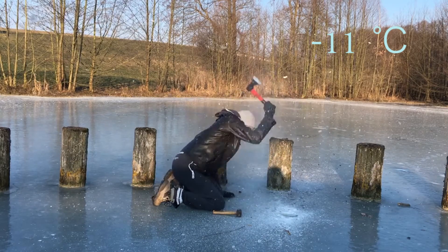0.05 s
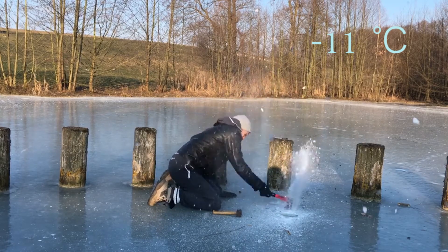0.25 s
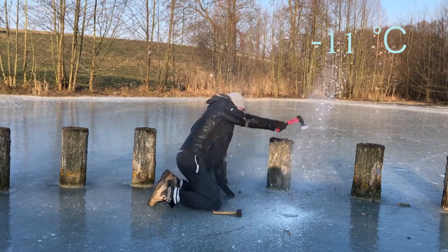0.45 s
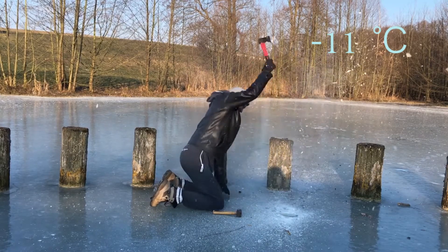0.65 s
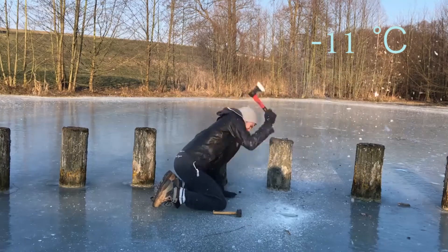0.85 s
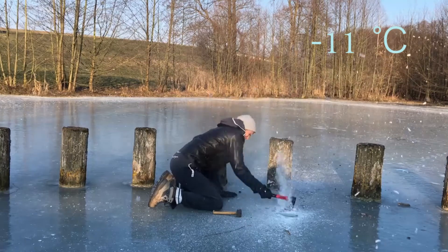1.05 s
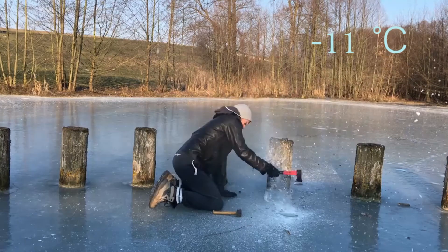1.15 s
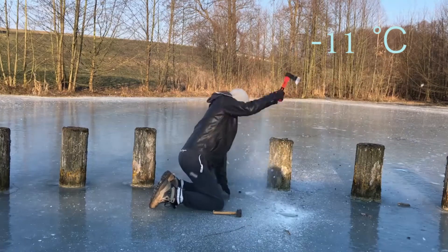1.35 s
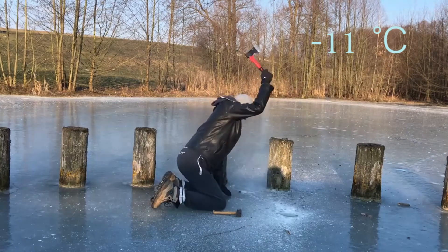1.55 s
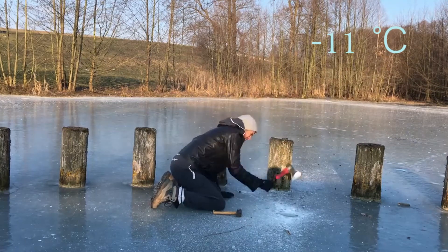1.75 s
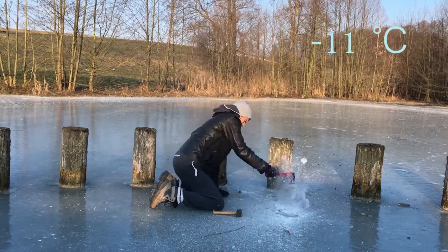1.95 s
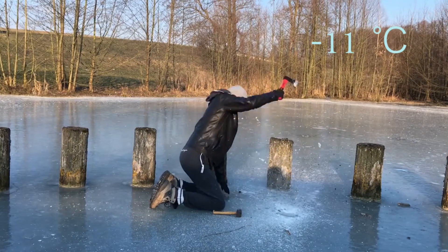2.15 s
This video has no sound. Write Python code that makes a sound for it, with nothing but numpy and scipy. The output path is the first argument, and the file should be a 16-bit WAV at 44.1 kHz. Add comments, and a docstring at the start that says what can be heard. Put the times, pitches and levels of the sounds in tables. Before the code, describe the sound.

On an open frozen pond, three loud hatchet chops crack and thud through the ice, the first strongest, the last with a short woody knock; ice chips click, burst and slide, over faint low air rumble.

```python
"""A hatchet chops three times into thick ice on a pond, a few metres from a phone's microphone. Each blow
arrives first through the ice, then as a crack through the air; the sheet thuds and rings, the banks answer.
Thrown chips tick, burst into spray and bounce as ringing lumps; ice dust skitters over a low open-air rumble.
Blows are noise bands, sine-and-noise rings, a bending wave and, in the third, a short pitched knock; chips
are clicks, grit, thin rings and tones; dust and air are coloured noise with wandering levels."""
import sys
import numpy as np
from scipy import signal
from scipy.fft import rfft, irfft, next_fast_len
from scipy.io import wavfile
from scipy.ndimage import map_coordinates

SR = 44100
rng = np.random.default_rng(int(sys.argv[2]) if len(sys.argv) > 2 else 0)


def unload_audio(sound):
    """Save the sound as a 16-bit wav file, at the path given as the first command line argument."""
    columns = np.transpose(np.atleast_2d(sound))
    # keep every value between -1 and 1, then stretch to whole-number steps
    steps = np.round(np.clip(columns, -1, 1) * 32767)
    wavfile.write(sys.argv[1], SR, steps.astype(np.int16))


def voltage_ratio(decibels):
    """Convert decibels (scalar or array-like) to amplitude ratios, 20 dB per decade."""
    exponent = np.asarray(decibels, float) / 20
    return 10 ** exponent


N = 97020  # samples, 2.2 s


def unit(x):
    """Scale to rms 1."""
    return x / np.sqrt(np.mean(x ** 2) + 1e-20)


def along(points, hz):
    """Read a curve of (Hz, value) points on a log frequency axis."""
    f, v = np.transpose(points)
    return np.interp(np.log(hz + 1), np.log(f + 1), v)


def filtered(x, response):
    """Multiply the spectrum of x by a response of frequency."""
    m = next_fast_len(len(x) + 4096)
    hz = np.fft.rfftfreq(m, 1 / SR) + 1e-3
    return irfft(rfft(x, m) * response(hz), m)[:len(x)]


def noise(n, response):
    """Coloured noise of rms 1."""
    return unit(filtered(rng.standard_normal(n), response))


def wobble(n, rate):
    """A smooth random curve through rate knots a second."""
    knots = rng.standard_normal(int(n * rate / SR) + 4)
    return map_coordinates(knots, [np.arange(n) * rate / SR])


def fall(t, t60):
    """Exponential decay from t = 0, by 60 dB in t60 seconds."""
    return voltage_ratio(-60 * np.maximum(t, 0) / t60)


def fade(t, t60, rise_s):
    """Silence before t = 0, then a rise with time constant rise_s under the exponential decay."""
    return (1 - np.exp(-np.maximum(t, 0) / rise_s)) * fall(t, t60)


def add(out, s, x):
    """Mix x into out at s seconds."""
    i = round(s * SR)
    out[i:i + len(x)] += x[:len(out) - i]


# Colour of the open air over the pond. Each row: frequency in Hz, density in relative dB per Hz.
AIR_COLOUR = [(13, -45), (22, -16), (60, 1), (152, -7.5), (213, -5), (239, -21), (411, -14.5), (553, -31),
              (5000, -39.5), (6500, -25), (11000, -120)]
AIR_DB, AIR_SWAY_DB = -52, 1.5


def air():
    """Low outdoor rumble: coloured noise whose level slowly breathes."""
    level = voltage_ratio(AIR_DB + AIR_SWAY_DB * wobble(N, 3.72))
    return level * noise(N, lambda f: voltage_ratio(along(AIR_COLOUR, f)))


# Fine ice dust sliding over the sheet. Each row: time in seconds, level in dB.
SKITTER_LEVEL = [(0.0, -42), (0.1, -53.5), (0.24, -40.5), (0.38, -43), (0.44, -41.5), (0.62, -37.5),
                 (0.94, -40.5), (1.33, -36), (1.56, -35), (1.72, -39.5), (1.91, -41), (2.02, -45),
                 (2.13, -38.5), (2.2, -32.5)]
# Colour of that dust. Each row: frequency in Hz, density in relative dB per Hz.
DUST_COLOUR = [(470, -2.5), (800, -7), (1310, 2), (1430, -5), (4100, -4), (5020, -12), (14400, -5.5),
               (16500, -1.5)]
CRUMBS_PER_S, CRUMB_T60 = 360, 0.021
CRUMB_DB, CRUMB_SPREAD_DB = -4, 6  # the smallest crumb, before the mix is set to rms 1, and the spread upwards
BIGGEST_SHARE = 0.93  # cuts off the rare biggest crumbs


def skitter():
    """Sliding dust: a flickering hiss, with brighter noise let through by crumbs landing at random."""
    s, db = np.transpose(SKITTER_LEVEL)
    where, size = rng.random((int(CRUMBS_PER_S * N / SR), 2)).T
    crumb_db = CRUMB_DB - CRUMB_SPREAD_DB * np.log(1 - BIGGEST_SHARE * size)
    hits = np.bincount((where * N).astype(int), voltage_ratio(crumb_db), N)
    crumbs = np.convolve(hits, fall(np.arange(600) / SR, CRUMB_T60))[:N]
    hiss = noise(N, lambda f: voltage_ratio(along(DUST_COLOUR, f))) * voltage_ratio(2.04 * wobble(N, 30.18))
    bright = noise(N, lambda f: voltage_ratio(along(DUST_COLOUR, f)) / (1 + (5000 / f) ** 4))
    level = voltage_ratio(np.interp(np.arange(N) / SR, s, db))
    return level * unit(hiss + crumbs * bright)


# Colour of one chip's click. Each row: frequency in Hz, gain in dB.
TICK_COLOUR = [(1500, -34), (4000, -20), (8000, -12.5), (11000, -4), (15000, 2), (18000, -22)]
TICK_S = 0.0003  # time constant to either side of the centre


def tick():
    """One very short bright click of peak 1, centred in 256 samples: an impulse in a puff of noise."""
    t = np.arange(-128, 128) / SR
    impact = (t == 0) + 1.6 * rng.standard_normal(256)
    click = filtered(np.exp(-np.abs(t) / TICK_S) * impact, lambda f: voltage_ratio(along(TICK_COLOUR, f)))
    return click / np.abs(click).max()


# Chips landing hard on the ice. Each row: time in seconds, click peak in dB, knock level in dB over it.
CHIP_TICKS = [(.2066, -6, -19), (.2182, -15, -11), (.223, -12, -20), (.2535, -24, -24), (.2717, -18, -24),
              (.394, -27, -8), (.464, -18, -22), (.531, -25, -3), (.6045, -19, -22), (.660, -14, -18),
              (.709, -16, -19), (.8412, -10, -22), (.859, -15, -22), (.898, -16, -22), (.9293, -23, -24),
              (.9373, -24, -20), (.9675, -26, -22), (.9746, -13, -18), (.9972, -5, -24), (1.056, -21, -12),
              (1.097, -21, -24), (1.199, -21, -24), (1.2232, -16, -16), (1.2515, -16, -4),
              (1.2532, -3, -16), (1.2945, -19, -24), (1.4815, -16, -12), (1.4835, -10, -18),
              (1.641, -14, -26), (1.729, -15, -16), (1.8208, -19, -30), (1.8677, -23, -28),
              (2.082, -16, -15), (2.095, -16, -14)]
KNOCK_HZ, KNOCK_T60 = 1100, 0.022


def ticks():
    """Hard landings: a click and a small knock of mid-pitched noise that dies at once."""
    out, n = np.zeros(N), SR // 3
    t = np.arange(n) / SR
    for s, db, knock_db in CHIP_TICKS:
        click = tick()
        add(out, s - len(click) / 2 / SR, voltage_ratio(db) * click)
        knock = noise(n, lambda f: f / (KNOCK_HZ + f * f / KNOCK_HZ / 3))
        add(out, s, voltage_ratio(db + knock_db) * fade(t, KNOCK_T60, 0.00054) * knock)
    return out


# Short pitched rings: lumps bouncing, and the 665 Hz knock of the third blow. Each row: start in seconds,
# level in dB, pitch in Hz, t60 in seconds, rattle from 0 (pure tone) to 1 (narrow noise).
SHORT_RINGS = [(.207, -33, 940, .08, .4), (.219, -25, 720, 0.03, 0.5), (.219, -33, 300, 0.037, 0.82),
               (.660, -34.5, 1420, 0.039, 0.46), (.709, -40, 3550, 0.11, 0.32), (.846, -36, 1350, 0.17, 1),
               (.860, -29.5, 9680, 0.032, .5), (.975, -34, 1370, 0.2, 0.9), (.997, -33.5, 3386, 0.16, 0.22),
               (1.068, -23, 12500, 0.015, 0.36), (1.253, -24, 683, 0.05, 0.18),
               (1.310, -35, 2230, 0.021, 0.8), (1.357, -36.5, 3286, 0.27, 0.2),
               (1.357, -30, 3680, 0.18, 0.2), (1.358, -26, 8540, 0.13, .8), (1.432, -38, 3340, 0.065, 0.1),
               (1.482, -25.5, 1330, .2, 0.7), (1.481, -31, 1653, 0.19, 0.54), (1.483, -32, 3690, 0.27, 0.8),
               (1.641, -43, 1377, 0.42, 0.8), (1.909, -39, 3800, .25, 0.12), (1.924, -17, 665, .08, .3)]


def short_rings():
    """Bouncing lumps and the third blow's knock: a decaying tone of wandering phase, blended with noise."""
    out, n = np.zeros(N), SR // 3
    t = np.arange(n) / SR
    for s, db, hz, t60, rattle in SHORT_RINGS:
        width_hz = 3.96 * hz ** 0.5
        rough = noise(n, lambda f: 1 / (1 + ((f - hz) / width_hz) ** 2))
        tone = np.sin(2 * np.pi * hz * t + rattle * wobble(n, 98))
        ring = unit(rattle * rough + (1 - rattle) * tone)
        add(out, s, voltage_ratio(db) * fade(t, t60, 0.00082) * ring)
    return out


SHARDS, SHARD_TOP_HZ, SHARD_T60 = 14, 9000, 0.09
SHARD_DB = -5  # the strongest possible shard, over its spray


def shards(t, low_hz, t60):
    """Thin rings inside one spray: decaying sines at random pitches and starts, the later the weaker."""
    where, late, size = rng.random((SHARDS, 3)).T[:, :, None]
    hz = low_hz * (SHARD_TOP_HZ / low_hz) ** where
    gain = voltage_ratio(SHARD_DB - 8 * size - 22 * late)
    rings = fade(t - late * t60 * 0.58, SHARD_T60, 0.0022) * np.sin(2 * np.pi * hz * t)
    return (gain * rings).sum(0)


# Chips bursting into spray. Each row: start in seconds, level in dB, lowest frequency in Hz, t60 in seconds.
CHIP_SPRAYS = [(.268, -30, 8800, 0.069), (0.279, -28.5, 3450, 0.1), (0.378, -37, 5100, 0.12),
               (0.426, -35, 4560, 0.075), (.530, -39.5, 1510, 0.37), (0.605, -34, 4930, 0.044),
               (0.66, -30, 5300, 0.11), (.708, -38.5, 2980, 0.16), (0.846, -31, 4480, 0.19),
               (.859, -25.5, 5820, 0.057), (.898, -40, 6870, 0.064), (.974, -30, 7800, 0.11),
               (0.998, -30, 6900, 0.071), (1.253, -12, 2400, 0.012), (1.266, -30, 5740, 0.095),
               (1.224, -35.5, 2990, 0.27), (1.293, -38.5, 6000, 0.26), (1.356, -24.5, 3080, 0.33),
               (1.39, -32, 3060, 0.16), (1.431, -24.5, 3130, 0.053), (1.481, -32.5, 1100, 0.73),
               (1.551, -29.5, 2920, 0.3), (1.624, -27.5, 4500, 0.031), (1.640, -35, 2840, 0.25),
               (1.729, -30, 2940, 0.18), (1.785, -31.5, 5120, 0.089), (2.062, -29, 3540, 0.14),
               (2.133, -30, 3160, 0.11)]
# Colour shared by the sprays. Each row: frequency in Hz, gain in dB.
SPRAY_COLOUR = [(1000, 13), (4000, 1), (8000, -1), (13000, 0.5), (16000, -3)]
GRIT_SWAY_DB = 1.3  # the slower part of the unevenness


def sprays():
    """Bursting chips: gritty noise above a lowest frequency, with thin shard rings inside."""
    out, n = np.zeros(N), SR // 3
    t = np.arange(n) / SR
    for s, db, low_hz, t60 in CHIP_SPRAYS:
        grit = voltage_ratio(2.55 * wobble(n, 495.3) + GRIT_SWAY_DB * wobble(n, 83.0))
        hiss = noise(n, lambda f: voltage_ratio(along(SPRAY_COLOUR, f)) / (1 + (low_hz / f) ** 24))
        burst = fade(t, t60, 0.00075) * unit(grit * hiss)
        add(out, s, voltage_ratio(db) * (burst + shards(t, low_hz, t60)))
    return out


LEAD_S = 0.009  # head start of the wave through the ice over the sound through the air
# The blow band by band, levels relative to the blow. Each row: centre in Hz, crack level in dB, crack t60
# in seconds, echo level in dB, echo t60 in seconds, level through the ice in dB.
BLOW_BANDS = [(44.5, -41, 0.17, -34, 0.33, -46), (82.5, -34, 0.3, -43.5, 1, -22.5),
              (218, -17, 0.033, -24, 0.35, -28), (320, -27, 0.012, -34, 0.76, -13),
              (652, -13.5, 0.052, -34.5, 0.39, -17), (1200, -12.5, 0.029, -28, 0.38, -9),
              (2660, -14.5, 0.036, -27, 0.34, -13.5), (4700, -22, 0.071, -28.5, 0.26, -23.5),
              (6860, -20, 0.066, -42, 0.44, -19.5), (14350, -14.5, 0.051, -31, 0.55, -44)]
CRUSH_S, SPLINTERS_DB, RISE_CYCLES = 0.0032, -3, 0.2  # breaking time, its unevenness, rise in cycles
BITE_T60 = 0.017  # the first bite of the edge dies fast
ECHO_SWAY_DB = 2.5


def chop(t, bite_db, tilt_db):
    """Ice breaking under the edge: noise bands carry the ice wave, the splintering crack and the banks' echo."""
    out, n = np.zeros(len(t)), len(t)
    for hz, crack_db, t60, echo_db, echo_t60, ice_db in BLOW_BANDS:
        through_ice = voltage_ratio(ice_db) * fade(t + LEAD_S, 0.081, 0.006)
        splinters = voltage_ratio(crack_db + SPLINTERS_DB * wobble(n, min(hz / 2, 900)))
        # a t60 of 99 s leaves little but the rise; the real decay waits for the breaking to end
        crack = splinters * fade(t, 99, RISE_CYCLES / hz) * fall(t - CRUSH_S, t60)
        if hz > 1500:
            crack = crack * (1 + voltage_ratio(bite_db) * fall(t, BITE_T60))
        echo = voltage_ratio(echo_db + ECHO_SWAY_DB * wobble(n, 59.4)) * fade(t, echo_t60, 0.0011)
        colour = voltage_ratio(tilt_db * max(np.log2(hz / 1000), 0))
        band = noise(n, lambda f: np.exp(-(np.log2(f / hz) / 0.51) ** 2))
        out += colour * (through_ice + crack + echo) * band
    return out


# Rough ringing of the sheet. Each row: pitch in Hz, level in dB relative to the blow, t60 in seconds.
SHEET_RINGS = [(215, -28.5, 0.25), (288, -31, 0.14), (609, -35.5, 0.8), (996, -39, 0.94),
               (1270, -10, 0.017), (1320, -31.5, 0.53), (2760, -39, 0.45)]
RING_WIDTH, RING_STEADY, RING_SCATTER_DB = 0.04, 0.7, 2  # share of the pitch, sine amplitude, blow to blow


def sheet(t):
    """The struck sheet rings: each mode is narrow noise plus a steady sine, dying together."""
    out = np.zeros(len(t))
    for hz, level_db, t60 in SHEET_RINGS:
        rough = noise(len(t), lambda f: 1 / (1 + ((f - hz) / (RING_WIDTH * hz)) ** 2))
        ring = rough + RING_STEADY * np.sin(2 * np.pi * hz * t)
        level = voltage_ratio(level_db + rng.normal(0, RING_SCATTER_DB))
        out += level * fade(t, t60, 0.0021) * ring
    return out


# Bending wave in the sheet. Each row: frequency in Hz, gain in dB.
BEND_COLOUR = [(20, -44), (40, -3), (90, 1), (160, -9.5), (280, 1), (400, 2), (520, -54), (800, -48),
               (1500, -45)]
BEND_LAG_S, BEND_LAW = 0.014, 0.7  # lag at 100 Hz; the lag falls with this power of frequency


def thud(n):
    """The bending wave: one push whose lower frequencies lag more, a falling sweep of peak 1."""
    push = 1.0 * (np.arange(n) == round(LEAD_S * SR))

    def response(f):
        # phase in turns: the lag summed over frequency, from a random start
        turns = BEND_LAG_S * 100 * (f / 100) ** (1 - BEND_LAW) / (1 - BEND_LAW) + rng.random()
        return voltage_ratio(along(BEND_COLOUR, f)) * np.exp(-2j * np.pi * turns)

    wave = filtered(push, response)
    return wave / np.abs(wave).max()


# The three blows. Each row: time of the crack in seconds, blow level in dB, first bite in dB over the
# splintering, thud peak in dB, treble tilt in dB per octave above 1 kHz.
HATCHET_BLOWS = [(0.319, -4, 10.5, -8, -1), (1.115, -8.5, -2.5, -14, 1.5), (1.9326, -8, 11, -11.5, 0.5)]


def hatchet():
    """Each blow breaks the ice, rings the sheet and bends it; the ice carries the first arrival."""
    out, n = np.zeros(N), SR // 2
    t = np.arange(n) / SR - LEAD_S  # zero when the crack arrives through the air
    for s, db, bite_db, thud_db, tilt_db in HATCHET_BLOWS:
        blow = voltage_ratio(db) * (chop(t, bite_db, tilt_db) + sheet(t))
        add(out, s - LEAD_S, blow + voltage_ratio(thud_db) * thud(n))
    return out


def scene():
    """Air, dust, chips and hatchet summed at the microphone, one channel."""
    return (air() + skitter() + ticks() + short_rings() + sprays() + hatchet())[None]


def roll_off(x):
    """The treble ends steeply here."""
    return signal.sosfilt(signal.butter(12, 16830, fs=SR, output="sos"), x)


EDGE_HZ, EDGE_DB = 15900, -40  # treble edge: little is kept above this
TOP = 1.0  # full scale


def record(dry):
    """A treble edge, then the loudest peaks rounding off at full scale."""
    x = filtered(dry[0], lambda f: np.where(f < EDGE_HZ, 1, voltage_ratio(EDGE_DB)))[None]
    mix = x / (1 + np.abs(x / TOP) ** 6) ** (1 / 6)
    return roll_off(mix)


dry = scene()
out = record(dry)
unload_audio(out)
```